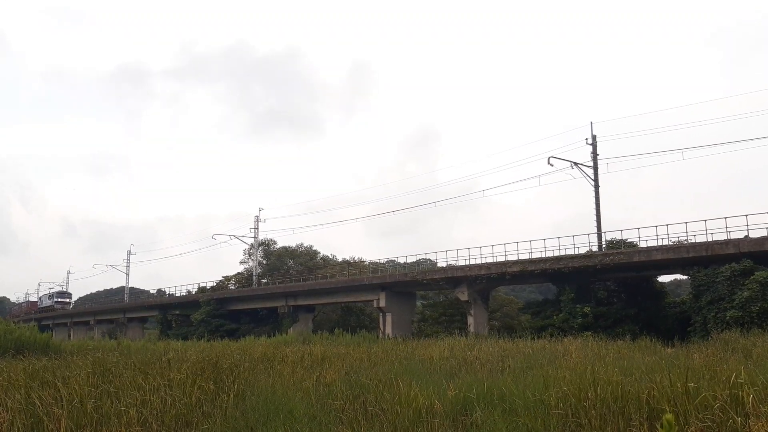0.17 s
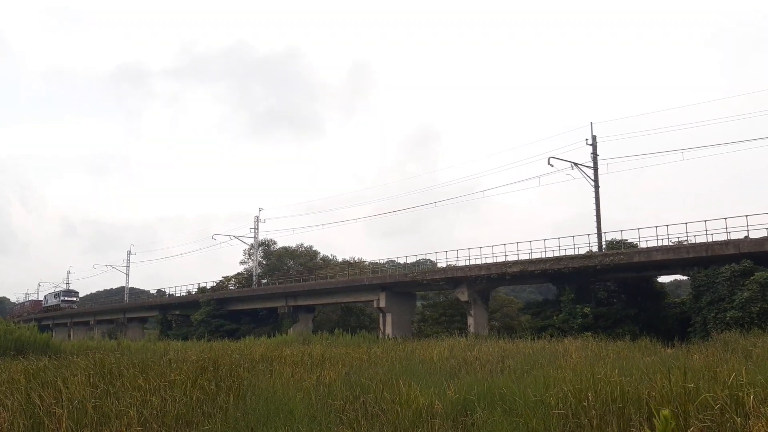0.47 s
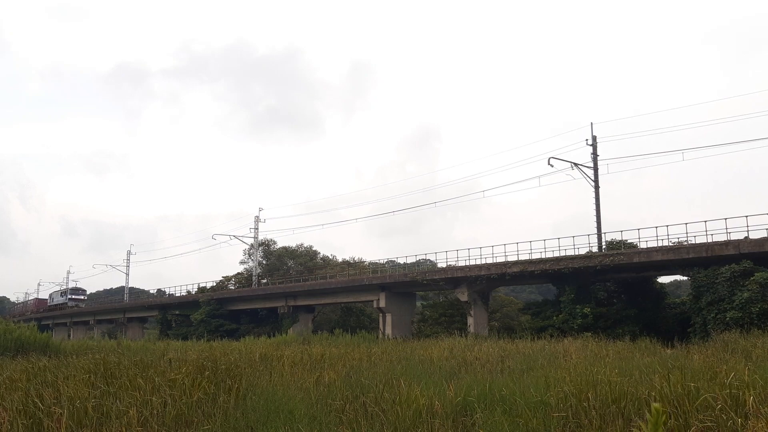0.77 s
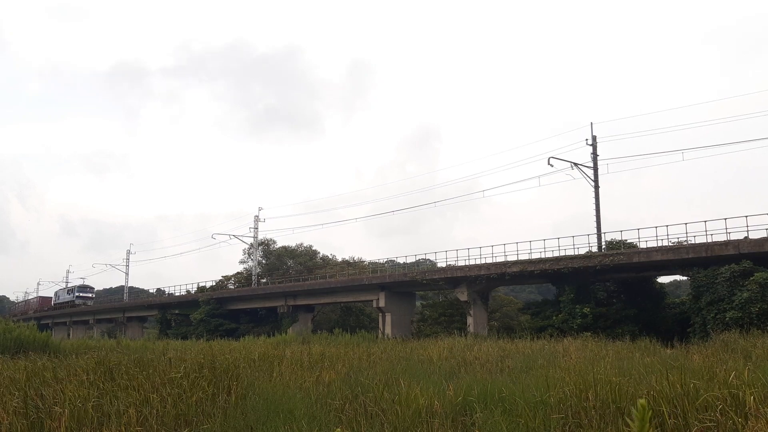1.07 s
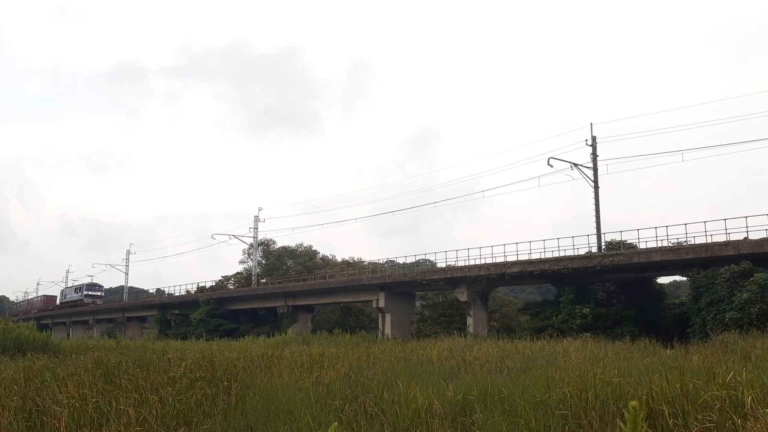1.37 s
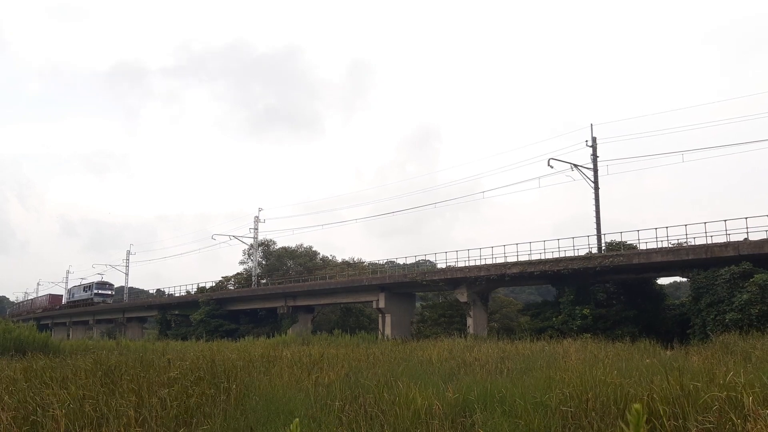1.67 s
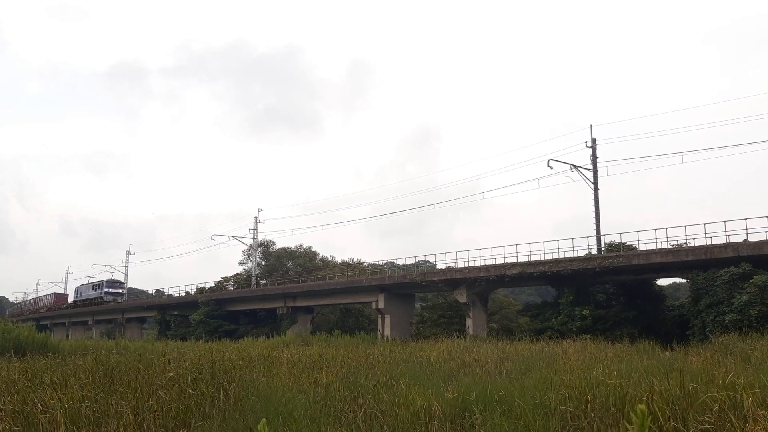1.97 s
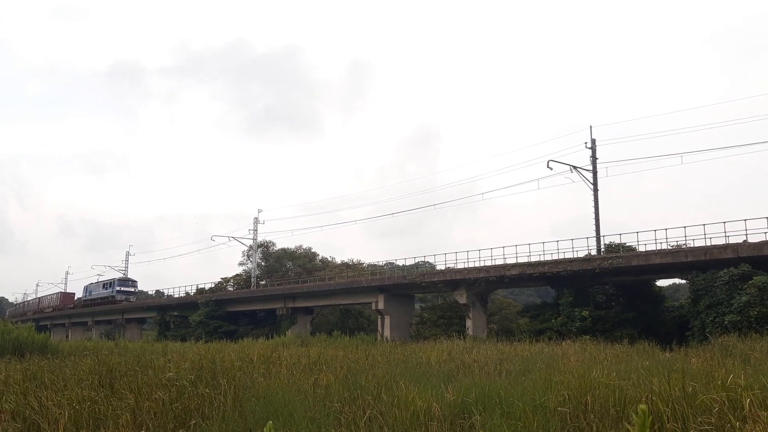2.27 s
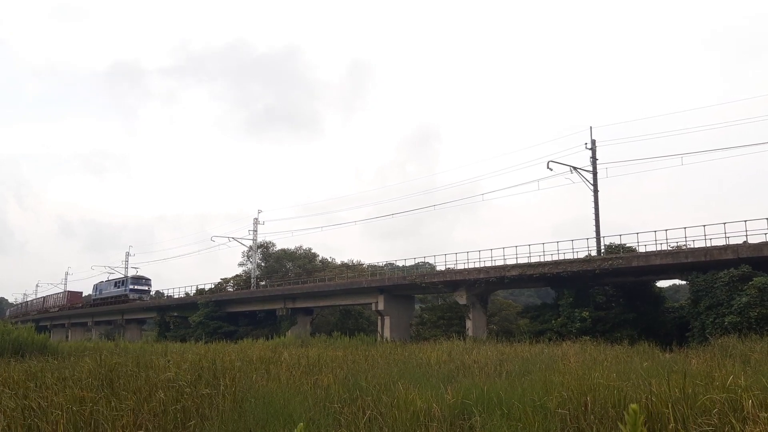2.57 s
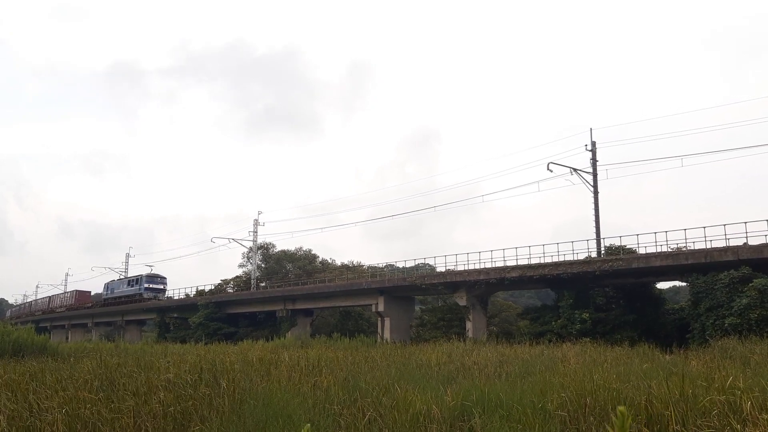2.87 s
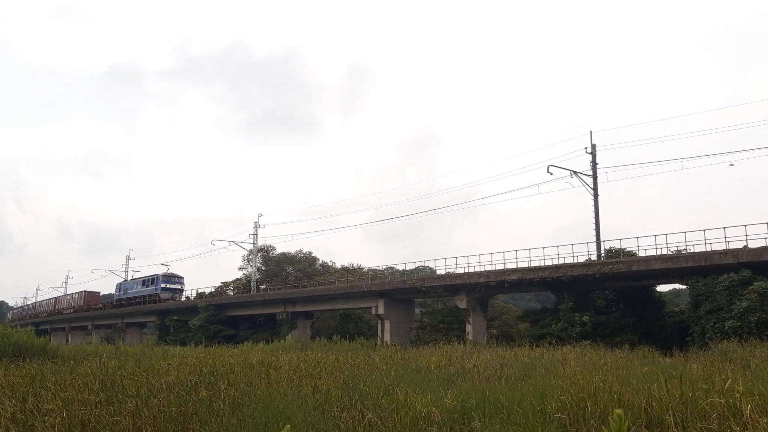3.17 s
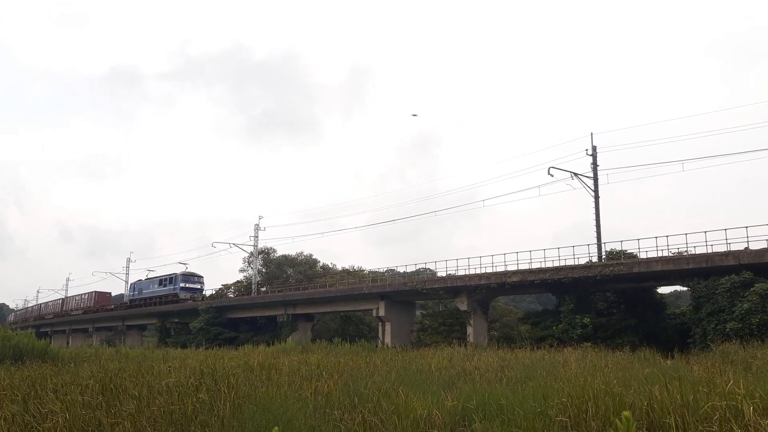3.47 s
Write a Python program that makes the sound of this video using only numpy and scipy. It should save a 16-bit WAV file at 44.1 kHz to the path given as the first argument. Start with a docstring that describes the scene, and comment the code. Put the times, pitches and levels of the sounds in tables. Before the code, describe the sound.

A freight train nears on a concrete viaduct: deep deck boom and rolling roar with irregular thuds and clanks, growing louder, rails ringing near the end; faint cricket trill, heard outdoors across a grass field in stereo.

```python
"""A freight train nears over a concrete viaduct, heard across a grass field through two microphone ports.
Shaped noise makes the deck's boom, drones and wagon rumble, the roar of wheels and the hiss of rails.
Noise bursts make the clacks at rail joints; narrow bands and wavering sines make the rails ring and sing.
A cricket trills in the grass as sliding sine notes; thin microphone hiss, separate in each port, lies on top."""
import sys
import numpy as np
from scipy import signal
from scipy.fft import rfft, irfft
from scipy.io import wavfile
from scipy.ndimage import uniform_filter1d

SR = 44100
rng = np.random.default_rng(int(sys.argv[2]) if len(sys.argv) > 2 else 0)


def put_to_file(sound):
    """Save the sound as 16-bit audio at rate SR, in the file named by the first command-line argument."""
    columns = np.atleast_2d(sound).T  # one column per channel
    safe = np.clip(columns, -1, 1)
    whole_steps = np.round(safe * 32767)
    wavfile.write(sys.argv[1], SR, whole_steps.astype(np.int16))


N = 159201

# how far the left port leads the right: frequency_hz, lead_rad
PORT_LEAD = [(20, -0.5), (200, 0.1), (400, 0.72), (900, 0.57), (1300, 1.13), (1700, 4), (2200, 1.16),
             (3000, 5), (3500, 3.5), (4200, 4), (4800, 5), (5400, 8), (6500, 8.6)]
# level difference of the ports: frequency_hz, left_minus_right_db
PORT_TILT = [(30, -5.3), (65, -4.3), (100, -3), (160, -2.3), (270, -3.5), (450, -1.3), (740, -2),
             (1220, -4.2), (2010, -3.2), (3330, -5), (5500, -6), (7200, -2), (10000, 3), (15000, 6.5)]
# swell of the rails' ringing, which their sizzle follows: time_s, level_db
RINGING_LEVEL = [(0, -64), (2.6, -58.5), (3.05, -51), (3.28, -43), (3.38, -43), (3.48, -50), (3.61, -44.5)]


def amp(db):
    """Decibels to gain."""
    return 10 ** (np.asarray(db) / 20)


def evened(x):
    """Scales to rms 1."""
    return x / np.sqrt(np.mean(x ** 2) + 1e-20)


def seconds():
    """Time of every sample."""
    return np.arange(N) / SR


def bins():
    """Frequencies of the full-length spectrum, in Hz."""
    return np.fft.rfftfreq(N, 1 / SR)


def read(points):
    """A table over frequency, joined on a log axis."""
    f, value = np.transpose(points)
    return np.interp(np.log(bins() + 1), np.log(f + 1), value)


def level(points):
    """A table of dB over time, as gain."""
    return amp(np.interp(seconds(), *np.transpose(points)))


def flutter(rate_hz):
    """Smooth random motion of rms 1, fading out above the given rate."""
    smoothing = 1 / (1 + (bins() / rate_hz) ** 4)
    return evened(irfft(rfft(rng.standard_normal(N)) * smoothing, N))


def from_train(gain):
    """Noise with the given spectrum, reaching both ports from the side; rms 1 over the pair."""
    # likeness of the two ports: frequency_hz, likeness (0 to 1)
    port_likeness = [(50, .94), (250, .95), (600, .94), (1000, .78), (1500, .62), (2500, .72), (4500, .7),
                     (6000, .3), (15000, .15)]
    a, b = rfft(rng.standard_normal((2, N)))
    same = np.clip(read(port_likeness), 0, 1)
    tilt = amp(read(PORT_TILT) / 2)
    right = same * a + np.sqrt(1 - same ** 2) * b
    right = right * np.exp(-1j * read(PORT_LEAD))
    return evened(irfft(np.array([a * tilt, right / tilt]) * gain, N))


def resonance(hz, width_hz):
    """Gain of one steep-sided resonance, halved at width_hz to either side."""
    return 1 / (1 + ((bins() - hz) / width_hz) ** 2)


def steadied(x, span_s):
    """Evens out swells slower than the span."""
    power = uniform_filter1d((x ** 2).mean(0), max(int(span_s * SR), 200))
    return x / np.sqrt(abs(power) + 1e-9)


def blow(start, rise, t60):
    """Envelope of a distant blow, smeared by its many paths: rise, hold, scattered tail (all in s)."""
    hold_s = 0.0033
    t = seconds() - start
    attack = np.clip(t / max(rise, .002), 0, 1)
    return attack * amp(-60 * np.maximum(t - rise - hold_s, 0) / t60)


def viaduct():
    """The deck booms firmly around its lowest resonance: steadied low noise."""
    # frequency_hz, level_db_per_hz (relative)
    boom_spectrum = [(20, -50), (35, -20.5), (50, -10.5), (60, 0), (68, 5.5), (78, 2), (100, -25.5),
                     (140, -30), (300, -71), (2000, -110)]
    # time_s, level_db
    boom_level = [(0, -43), (.16, -42.5), (.3, -34), (.47, -38.5), (.65, -35.5), (.76, -40.5), (.98, -34.5),
                  (1.2, -39.5), (1.29, -32), (1.38, -41.5), (1.68, -33), (1.9, -35), (2.2, -29.5),
                  (2.4, -36.5), (2.68, -35), (2.97, -25.5), (3.17, -37), (3.52, -30)]
    return steadied(from_train(amp(read(boom_spectrum))), span_s=0.045) * level(boom_level)


def wheel_roar(rough_db=1.08):
    """Wheels rolling on the deck roar as broad noise with a rough level."""
    # frequency_hz, level_db_per_hz (relative)
    roar_spectrum = [(20, -60), (40, -41.5), (75, -0.5), (100, 8.5), (135, 5.5), (165, -2.5), (230, -1),
                     (295, 1), (360, -3.5), (470, -2.5), (580, -4.5), (670, -7), (760, -19), (860, -13.5),
                     (980, -13), (1180, -22), (1330, -14.5), (1530, -19.5), (1800, -17.5), (2600, -20.5),
                     (5000, -61), (8000, -103)]
    # time_s, level_db
    roar_level = [(0, -37), (.6, -35), (1.08, -36), (1.5, -36.5), (2.2, -35.5), (2.72, -33.5), (2.83, -31),
                  (3.25, -30.5), (3.61, -30.5)]
    roar = steadied(from_train(amp(read(roar_spectrum))), span_s=0.06)
    return roar * level(roar_level) * amp(rough_db * flutter(rate_hz=17.5))


def mid_roar():
    """The middle of the rolling roar, mostly 260 to 1000 Hz, generally growing towards the end."""
    # frequency_hz, level_db_per_hz (relative)
    mid_roar_spectrum = [(150, -32), (260, -3.5), (560, 1.5), (780, -12.5), (1000, -9), (1700, -36.5),
                         (5000, -74)]
    # time_s, level_db
    mid_roar_level = [(0, -49), (1.3, -45.5), (1.55, -41), (2.2, -39), (2.73, -42), (2.83, -34.5),
                      (3.61, -35.5)]
    return steadied(from_train(amp(read(mid_roar_spectrum))), span_s=.03) * level(mid_roar_level)


def joints(rattle_db=-1.3):
    """Each axle thuds into the deck, clanks in its bogie and rings its wheels: three decaying noises."""
    # wheels over rail joints: start_s, thud_db, clank_db, ring_db, rise_s
    clacks = [(.139, -25.5, -36, -45.5, 0.0066), (0.272, -33, -42.5, -66, 0.022),
              (.428, -33, -45.5, -53, 0.027), (.58, -39, -46, -60, 0.026), (.747, -35.5, -43, -52, 0.02),
              (.875, -37.5, -43, -57, 0.02), (1.124, -36, -50, -46.5, 0.0081),
              (1.25, -41, -47, -45.5, 0.01), (1.456, -36.5, -41.5, -65, 0.028),
              (1.6, -33.5, -44, -47, 0.033), (1.747, -33, -44.5, -49, 0.035),
              (1.975, -45.5, -45.5, -44.5, 0.024), (2.09, -43, -46, -52, 0.033),
              (2.215, -35, -51.5, -69, 0.027), (2.58, -42, -48, -46.5, 0.016),
              (2.783, -28, -39, -50.5, 0.029), (2.927, -34.5, -39, -63, .011),
              (3.093, -29, -40.5, -48, 0.019), (3.28, -29, -43, -67, 0.027),
              (3.415, -28.5, -41, -63, 0.014), (3.53, -27, -36.5, -63, .017)]
    # deck thud: frequency_hz, level_db_per_hz (relative)
    thud_spectrum = [(100, -32), (220, -12.5), (350, 0.5), (470, -7), (550, 1.5), (660, -10.5), (780, -30),
                     (1200, -49), (5000, -82)]
    # bogie clank: frequency_hz, level_db_per_hz (relative)
    clank_spectrum = [(500, -21.5), (800, -5), (1040, 4.5), (1270, -5), (1550, -7.5), (1780, 1),
                      (2050, -21), (2350, -1), (2900, -11.5), (3700, -14.5), (4900, -19), (6200, -34),
                      (8000, -84)]
    thud_t60_s, clank_t60_s, ring_t60_s = 0.16, 0.31, 0.57

    thud_blows = sum(amp(db) * blow(s, rise, thud_t60_s) for s, db, _, _, rise in clacks)
    clank_blows = sum(amp(db) * blow(s, rise, clank_t60_s) for s, _, db, _, rise in clacks)
    ring_blows = sum(amp(db) * blow(s, rise, ring_t60_s) for s, _, _, db, rise in clacks)
    thud = thud_blows * steadied(from_train(amp(read(thud_spectrum))), span_s=0.04)
    clank = clank_blows * from_train(amp(read(clank_spectrum)))
    ring = ring_blows * steadied(from_train(resonance(hz=1850, width_hz=61)), span_s=0.011)
    return (thud + clank + ring) * amp(rattle_db * flutter(rate_hz=48))


def chinks():
    """Loose steel snaps brightly: blows on one broad high resonance."""
    # start_s, level_db
    snaps = [(0.138, -51), (.275, -52), (2.932, -47)]
    blows = sum(amp(db) * blow(s, rise=0.0042, t60=.25) for s, db in snaps)
    return blows * from_train(resonance(hz=4540, width_hz=370))


def rail_hiss(rough_db=1.52):
    """The rails hiss under the wheels: treble noise with a rough level."""
    # frequency_hz, level_db_per_hz (relative)
    hiss_spectrum = [(900, -29), (1550, -14), (1800, 9.5), (2030, -24), (2300, 4), (3050, -6), (3500, 6),
                     (4200, 0), (4520, -3), (4800, -4.5), (5500, -8.5), (6200, -16), (7100, -19.5),
                     (8000, -49), (10000, -54), (15000, -51)]
    # time_s, level_db
    hiss_level = [(0, -52), (1.05, -50.5), (1.24, -44), (1.55, -50.5), (1.68, -47), (1.88, -47.5),
                  (2.02, -45), (2.35, -50), (2.7, -48.5), (3, -44), (3.25, -40), (3.61, -40.5)]
    hiss = from_train(amp(read(hiss_spectrum)))
    return hiss * level(hiss_level) * amp(rough_db * flutter(rate_hz=18.5))


def rail_ringing():
    """The rails ring in their modes under the nearing wheels: noise through narrow resonances."""
    # mode_hz, full_width_hz, level_db (relative)
    rail_modes = [(2293, 25, -6), (2600, 60, -3), (3390, 70, -3), (3640, 60, -2), (3978, 35, -5),
                  (4377, 40, -5), (4727, 30, -5), (4830, 40, -5), (5230, 60, -8), (5717, 40, -9)]
    modes = sum(amp(db) * resonance(hz, width / 2) for hz, width, db in rail_modes)
    return from_train(modes) * level(RINGING_LEVEL)


def squeals(waver_hz=13):
    """Single steel modes catch and sing clearly for a moment: sines that waver and swell."""
    # peak_s, half_length_s, pitch_hz, level_db
    singing_modes = [(3.15, .07, 3612, -52), (3.17, .1, 4382, -54), (3.26, .06, 3420, -49),
                     (3.34, .1, 2582, -46.5), (3.32, .11, 4730, -54), (3.34, .07, 5626, -57)]
    t, out = seconds(), np.zeros((2, N))
    for s, half, hz, db in singing_modes:
        phase = 2 * np.pi * np.cumsum(hz + waver_hz * flutter(rate_hz=35)) / SR
        tilt = amp(np.interp(hz, *np.transpose(PORT_TILT)) / 2)
        lead = np.interp(hz, *np.transpose(PORT_LEAD))
        pair = np.array([tilt * np.sin(phase), np.sin(phase - lead) / tilt])
        swell = np.exp(-((t - s) / half) ** 2)
        out += np.sqrt(2) * amp(db) * swell * pair
    return out


def sizzle():
    """Fine treble noise from the singing rails, swelling with their ringing."""
    # frequency_hz, level_db_per_hz (relative)
    sizzle_spectrum = [(4000, -30), (5800, 2.5), (7200, -4), (8300, -24.5), (9500, -8), (11000, -4),
                       (15000, -4.5)]
    below_ringing_db = -13.5
    return from_train(amp(read(sizzle_spectrum))) * level(RINGING_LEVEL) * amp(below_ringing_db)


def drones(width_hz=7):
    """Higher deck modes swell and fade under the train: narrow bands of steadied noise."""
    # peak_s, half_length_s, pitch_hz, level_db
    deck_modes = [(3.08, 0.13, 304.3, -34.5), (3.517, 0.15, 138, -33)]
    t, out = seconds(), np.zeros((2, N))
    for s, half, hz, db in deck_modes:
        tone = steadied(from_train(resonance(hz, width_hz)), span_s=0.085)
        out += amp(db) * np.exp(-((t - s) / half) ** 2) * tone
    return out


def wagons():
    """The long line of wagons behind rumbles as steadied low noise, slowly rising and falling."""
    # frequency_hz, level_db_per_hz (relative)
    wagon_spectrum = [(20, -26), (33, -12.5), (45, -6.5), (58, 7.5), (85, -1.5), (130, 6), (190, -3),
                      (260, -20), (400, -10.5), (1500, -73), (5000, -100)]
    # time_s, level_db
    wagon_level = [(0, -41.5), (.5, -39), (1.1, -39), (1.55, -33), (2.3, -40.5), (3.61, -33)]
    return steadied(from_train(amp(read(wagon_spectrum))), span_s=0.091) * level(wagon_level)


def cricket(side_db=-2, waver_hz=30, wander_hz=50):
    """An even trill of nearly pure notes, each sliding down as the wing slows."""
    # time_s, level_db
    trill_level = [(0, -58), (.4, -57), (.65, -54), (1.05, -54), (1.25, -56.5), (1.42, -52), (2.1, -58),
                   (3.61, -61)]
    first_s, period_s, stroke_s = .048, .0535, .03
    middle_hz, sag_hz_per_s = 3990, 14000
    # time from the middle of the nearest stroke
    since = (seconds() - first_s + period_s / 2) % period_s - period_s / 2
    stroke = np.cos(np.pi * np.clip(since / stroke_s, -.5, .5))
    hz = middle_hz - sag_hz_per_s * since
    hz = hz + waver_hz * flutter(rate_hz=75.8) + wander_hz * flutter(rate_hz=12.3)
    phase = 2 * np.pi * np.cumsum(hz) / SR
    # the ports sit a quarter turn apart, the left one quieter
    pair = np.array([amp(side_db) * np.sin(phase), amp(-side_db) * np.cos(phase)])
    return np.sqrt(2) * pair * stroke * level(trill_level) * amp(flutter(rate_hz=22))


def mic_hiss(flicker_db=1.5):
    """Thin high noise, separate in each port, flickering slightly."""
    # frequency_hz, level_db_per_hz (relative)
    hiss_spectrum = [(3000, -36), (6000, -1.5), (7200, -0.5), (8200, -42), (9300, -13.5), (10800, -13.5),
                     (12500, -1), (14000, 2.5), (16000, 0.5)]
    middle_db, side_db = -59.5, 1.5  # the left port is louder
    hiss = evened(irfft(rfft(rng.standard_normal((2, N))) * amp(read(hiss_spectrum)), N))
    port_gain = amp([[middle_db + side_db], [middle_db - side_db]])
    return hiss * port_gain * amp(flicker_db * flutter(rate_hz=90))


def scene():
    """Train, cricket and hiss together."""
    deck = viaduct() + drones() + wagons()
    wheels = wheel_roar() + mid_roar() + joints() + chinks()
    rails = rail_hiss() + rail_ringing() + squeals() + sizzle()
    return deck + wheels + rails + cricket() + mic_hiss()


def record(dry):
    """The recorder's upper band limit, with soft ends."""
    edge_hz, fade_samples = 15850, 100
    from_end = np.minimum(np.arange(N), np.arange(N)[::-1])
    ends = np.sin(np.pi / 2 * np.clip(from_end / fade_samples, 0, 1)) ** 2
    lowpass = signal.firwin(511, edge_hz, window=("kaiser", 9), fs=SR)
    return signal.oaconvolve(dry * ends, lowpass[None], "same")


dry = scene()
out = record(dry)
put_to_file(out)
```